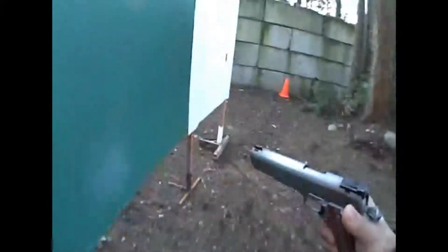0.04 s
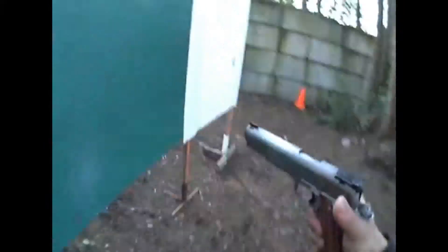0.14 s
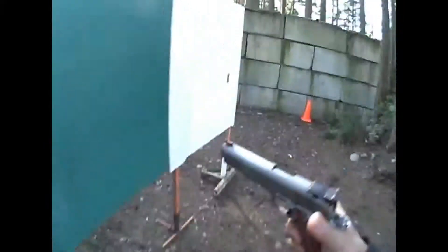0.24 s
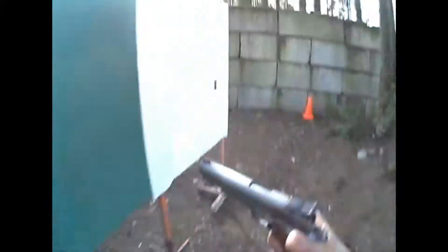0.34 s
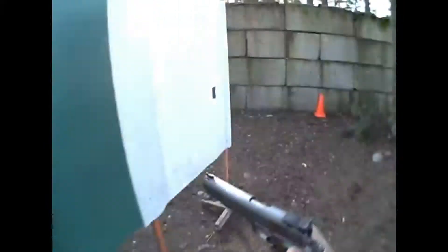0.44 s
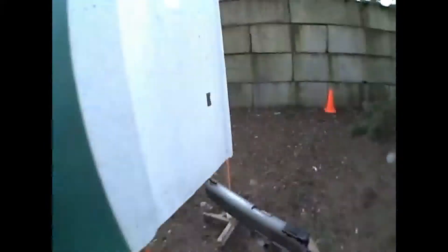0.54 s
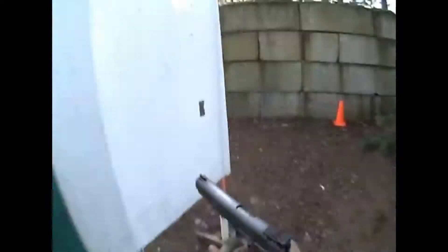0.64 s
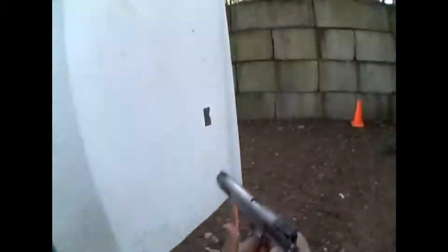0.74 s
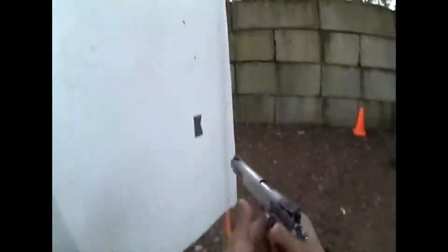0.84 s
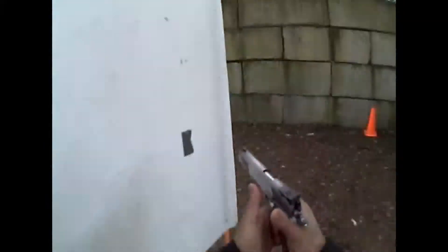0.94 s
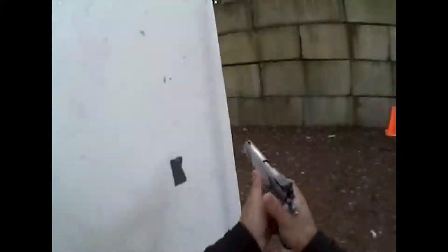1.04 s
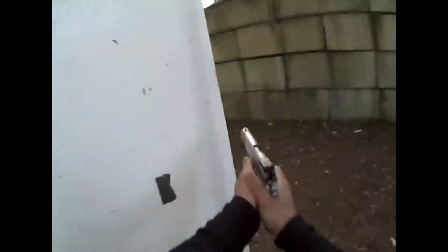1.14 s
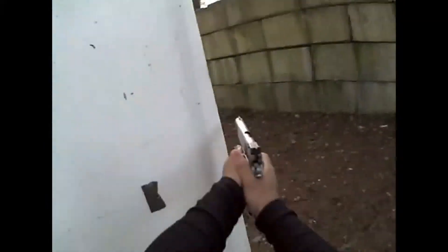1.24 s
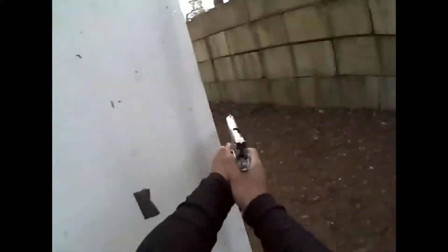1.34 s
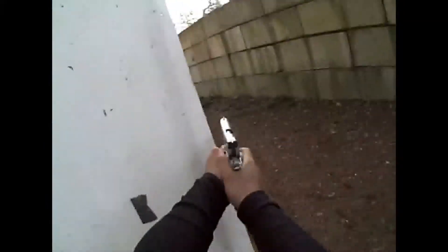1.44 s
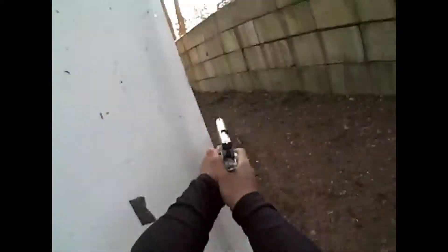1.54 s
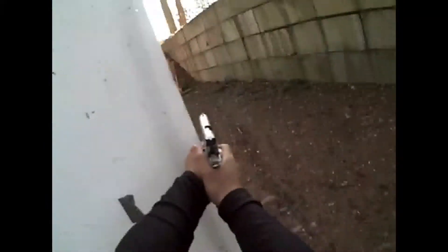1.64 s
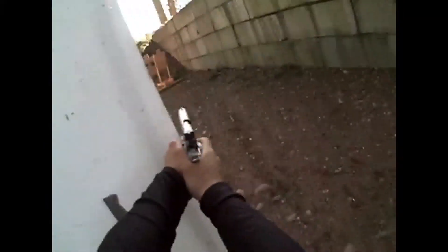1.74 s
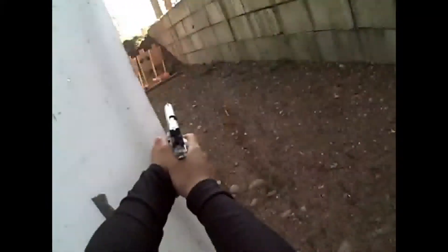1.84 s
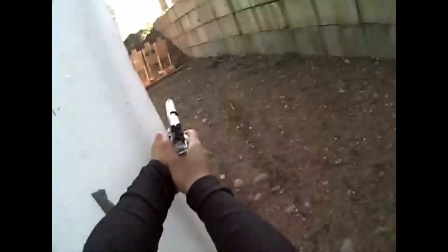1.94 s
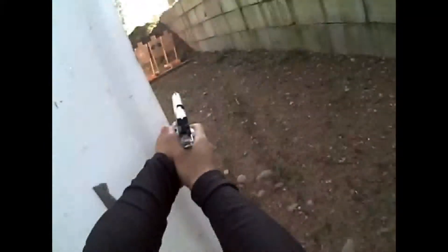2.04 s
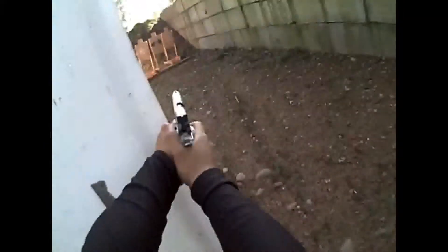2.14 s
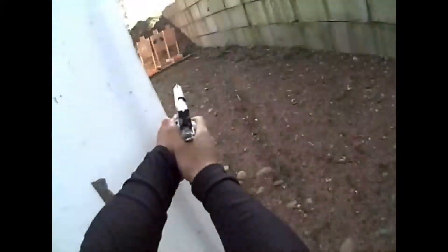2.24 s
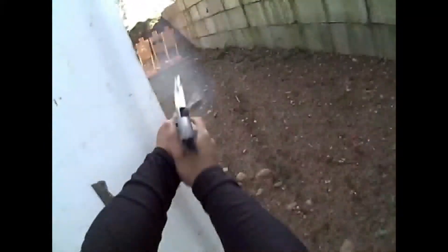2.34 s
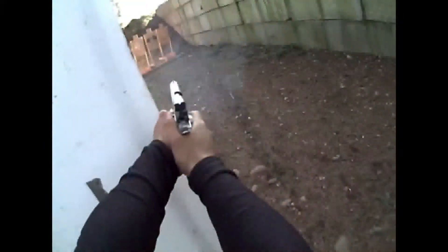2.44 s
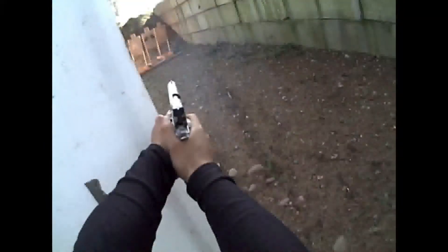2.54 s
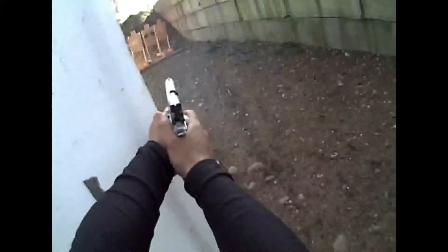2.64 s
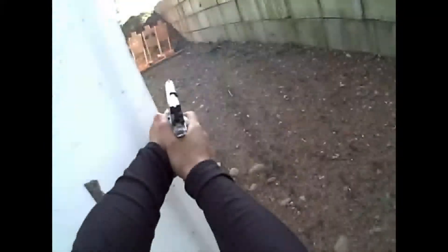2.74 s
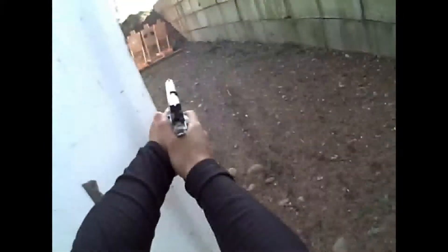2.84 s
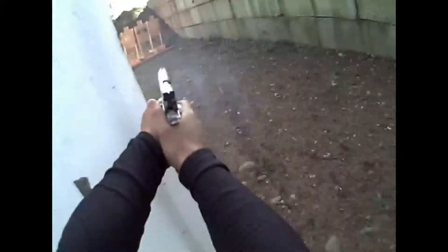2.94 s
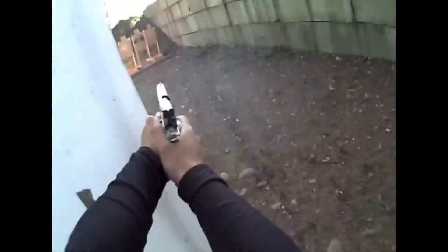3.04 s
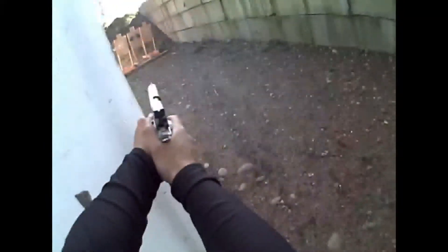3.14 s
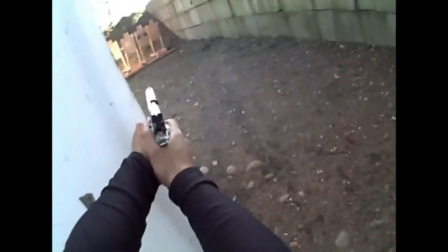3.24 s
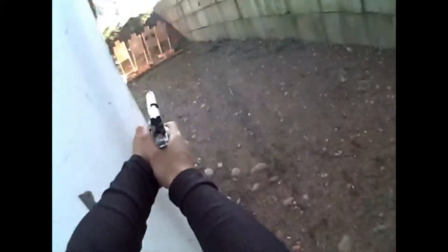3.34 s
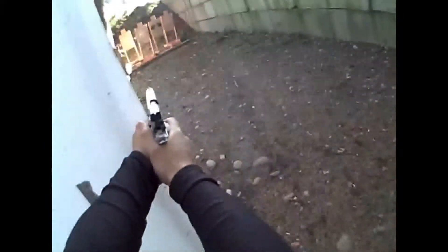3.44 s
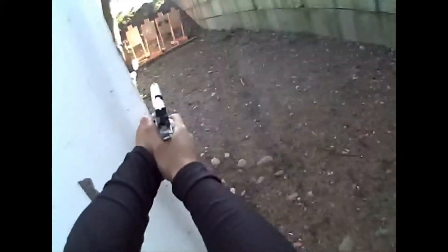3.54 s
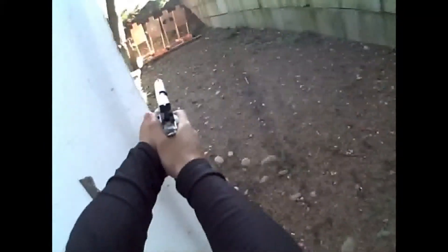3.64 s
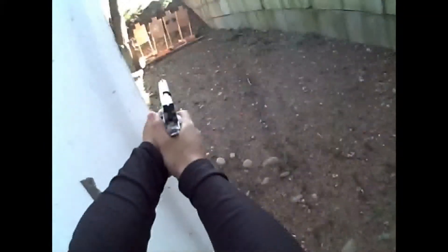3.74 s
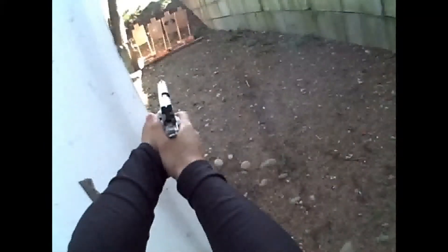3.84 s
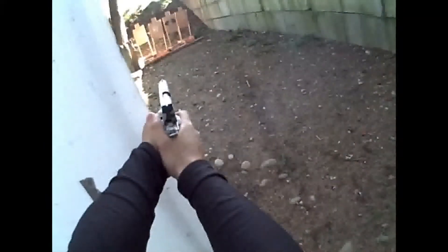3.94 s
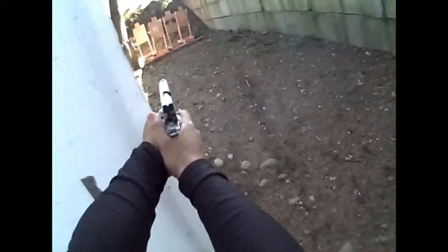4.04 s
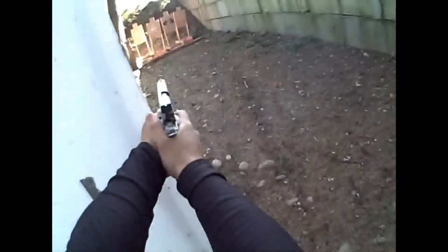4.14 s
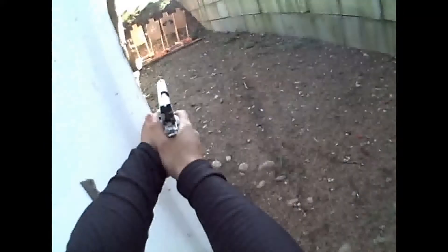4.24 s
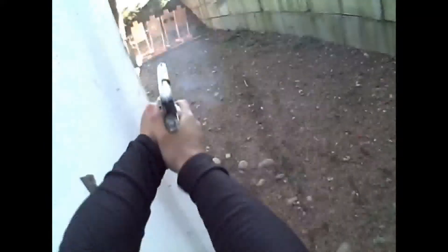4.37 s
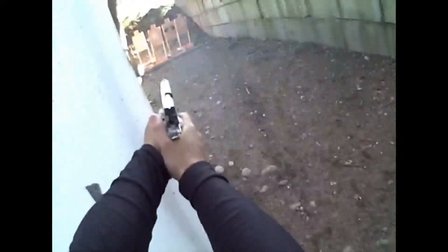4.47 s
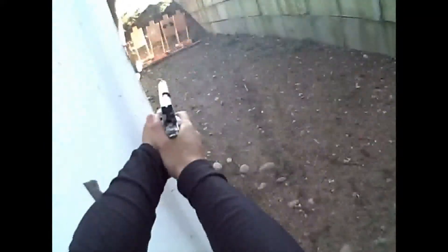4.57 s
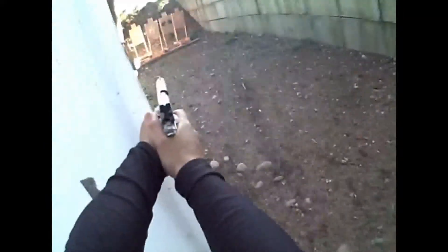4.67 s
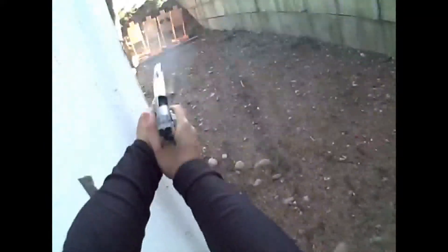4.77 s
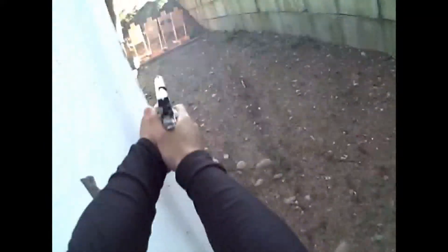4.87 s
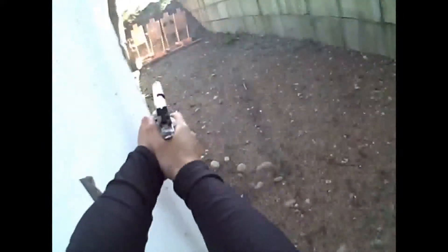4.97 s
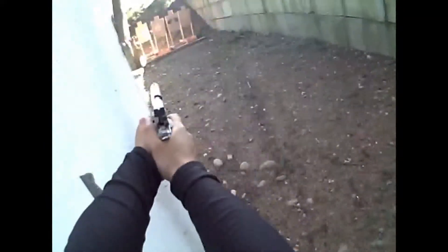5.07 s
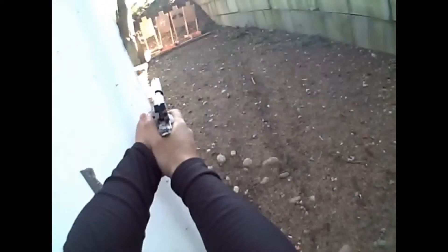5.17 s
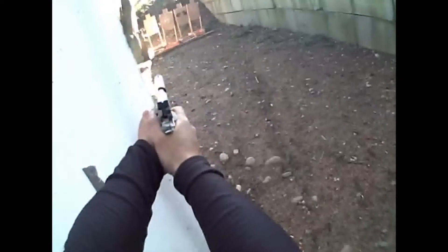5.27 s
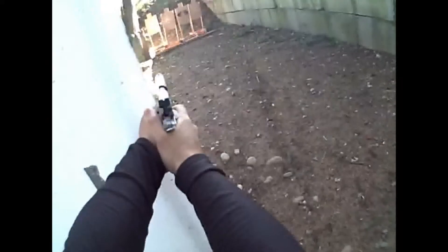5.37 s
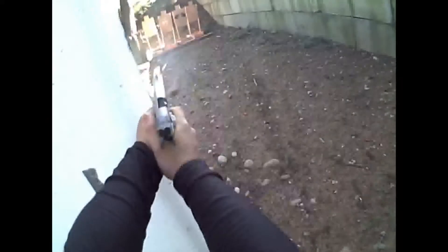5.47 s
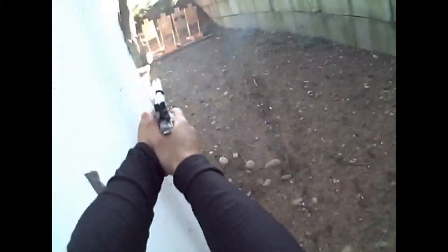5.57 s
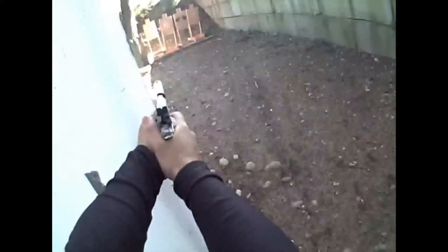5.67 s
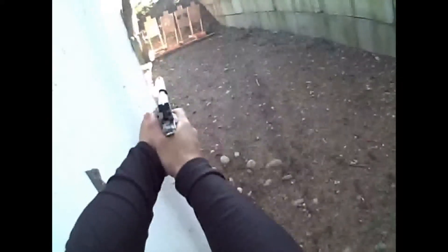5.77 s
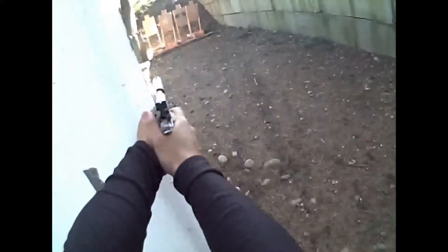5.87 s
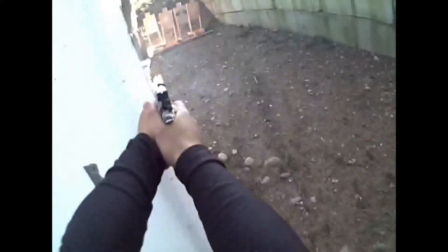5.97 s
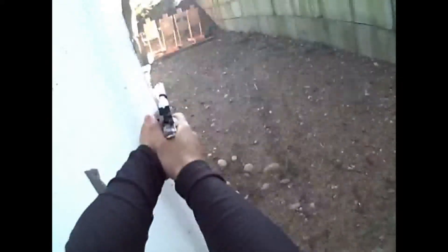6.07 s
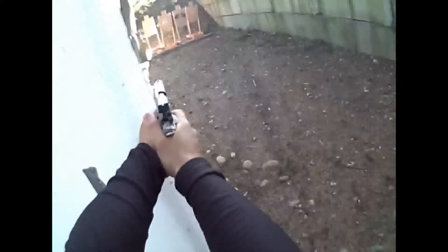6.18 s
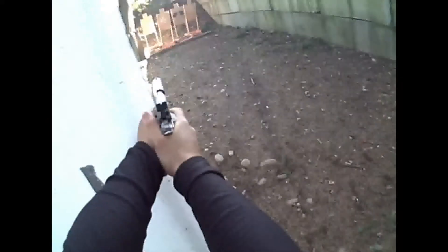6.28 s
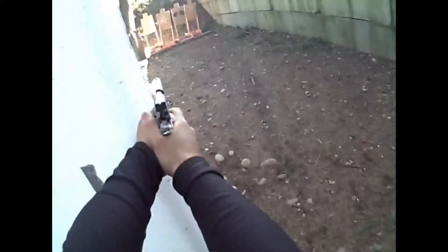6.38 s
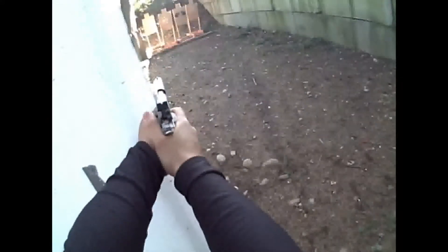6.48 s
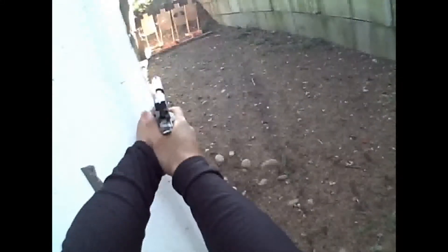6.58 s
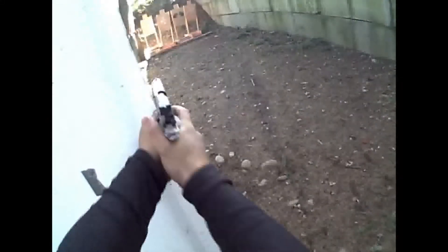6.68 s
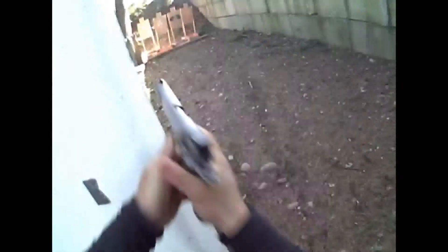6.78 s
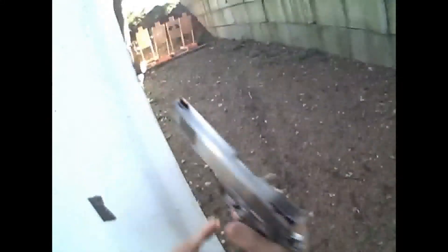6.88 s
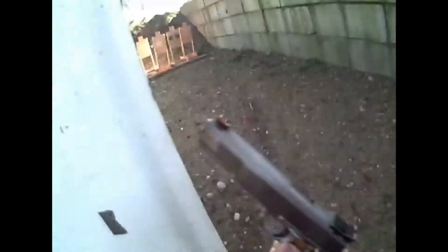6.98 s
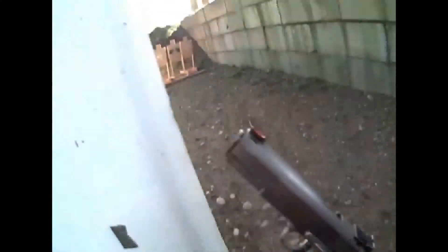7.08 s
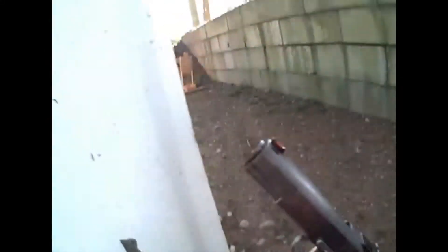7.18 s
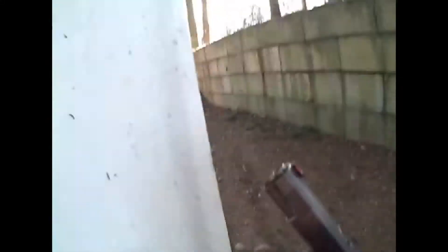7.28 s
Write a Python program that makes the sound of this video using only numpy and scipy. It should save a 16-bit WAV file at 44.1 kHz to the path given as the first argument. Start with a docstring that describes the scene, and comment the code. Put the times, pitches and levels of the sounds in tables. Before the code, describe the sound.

A close pistol fires three pairs of sharp, booming shots, about half a second apart within each pair, distorting a head-worn microphone and echoing briefly off walls and surrounding woods. Before the firing, the shooter steps up with dull thuds, cloth rustle and a few clicks while duller gunshots roll in from other bays. A faint distant roar and low air rumble lie underneath.

```python
"""Six pistol shots in three pairs, close to a head-worn microphone in a walled outdoor range bay.
Each blast overloads the microphone, flutters between the block walls and reverberates in the trees.
Shots from neighbouring bays arrive by diffraction over the wall and by scattering from the trunks.
The shooter steps up, his sleeves and gear stir, and a spent case rings on the stones.
Air buffets the microphone over a faint, distant roar."""
import sys
import numpy as np
from scipy import signal
from scipy.fft import rfft, irfft
from scipy.io import wavfile

SR = 44100
rng = np.random.default_rng(int(sys.argv[2]) if len(sys.argv) > 2 else 0)


def unload_wav(signal):
    """Save mono or channel-first audio to the path in sys.argv[1] as 16-bit WAV at rate SR, clipped to [-1, 1]."""
    wavfile.write(
        sys.argv[1],
        SR,
        np.round(np.clip(np.atleast_2d(signal).T, -1, 1) * 32767).astype(np.int16),
    )


N = 322415
T = np.arange(N) / SR
AGE = T[:3 * SR]  # time since an onset

# Reverberation of the forest. Each row: frequency in Hz, relative level in dB, T60 in seconds.
FOREST_BANDS = [(40, -9.5, 2.8), (170, -11.5, 16), (280, -12, 6.7), (453, -2.5, 2.8), (900, 2.5, 2.1),
                (1660, -3, 1.9), (2880, -3, 1.4), (5500, -6, 1.2), (8500, -12, 0.78)]
# Spectrum of distant sound. Each row: frequency in Hz, relative level in dB.
DISTANT_SPECTRUM = [(40, -9.5), (250, -5.5), (520, 4.5), (1050, -0.5), (1700, -8), (3200, -16), (6000, -23),
                    (8500, -23)]


def amp(db):
    """Amplitude ratio of a level in decibels."""
    return 10 ** (np.asarray(db) / 20)


def read(points, hz, column=1):
    """Interpolation of one table column on a logarithmic frequency axis."""
    table = np.transpose(points)
    return np.interp(np.log(hz + 1), np.log(table[0]), table[column])


def add(mix, start_s, sound):
    """Superposition of a sound on the mix; its onset may precede time zero."""
    at = round(start_s * SR)
    sound = sound[max(-at, 0):]
    part = mix[max(at, 0):][:len(sound)]
    part += sound[:len(part)]


def lowpass(x, hz):
    """Zero-phase low-pass filtering with a windowed sinc."""
    return signal.oaconvolve(x, signal.firwin(301, hz, window=("kaiser", 9), fs=SR), "same")


def noise(spectrum, size, top_hz=8750):
    """Spectral shaping of white noise, band-limited and scaled to unit rms."""
    hz = np.fft.rfftfreq(size, 1 / SR)
    x = irfft(rfft(rng.standard_normal(size)) * amp(read(spectrum, hz)) * (hz < top_hz), size)
    return x / x.std()


def reverberation(bands, rise_s):
    """A diffuse field builds up, then decays exponentially with each band's own T60."""
    hz, t, frames = signal.stft(noise(bands, len(AGE)), SR, nperseg=512)
    t60 = read(bands, hz, column=2)[:, None]
    decaying = signal.istft(frames * np.exp(-np.log(1000) * t / t60), SR, nperseg=512)[1]
    return decaying[:len(AGE)] * (1 - np.exp(-AGE / rise_s))


def burst(spectrum, decay_s):
    """A noise transient with instant onset and exponential decay."""
    t = AGE[:SR // 2]
    return noise(spectrum, len(t)) * np.exp(-t / decay_s)


def movement(rise_s=0.017, fade_s=0.073):
    """Amplitude envelopes of air buffet and sleeve rustle: each move rises, holds and fades."""
    # The shooter steps up, pushes his arms out, settles, shifts his aim twice and lowers the pistol.
    # Each row: start in seconds, end in seconds, buffet in dB, rustle in dB.
    moves = [(-.1, 1.313, -32, -70), (1.37, 1.601, -31, -57.5), (1.77, 2.347, -30, -61),
             (4.035, 4.2, -47.5, -87), (5.231, 5.408, -46.5, -84), (6.846, 7.307, -58, -89.5)]
    buffet, rustle = np.zeros((2, N))
    for start, end, buffet_db, rustle_db in moves:
        shape = np.clip((T - start) / rise_s, 0, 1) * np.exp(-np.maximum(T - end, 0) / fade_s)
        buffet += amp(buffet_db) * shape
        rustle += amp(rustle_db) * shape
    return buffet, rustle


def outdoor_air(buffet, roar_db=-81, still_db=-59):
    """Ambient roar of range and woods, and flow noise that grows as the microphone moves."""
    # Buffeting at the microphone. Each row: frequency in Hz, relative level in dB.
    flow_spectrum = [(3, 18), (12, 9.5), (35, -0.5), (70, -14), (140, -24.5), (300, -42.5), (1000, -70.5)]
    roar = amp(roar_db) * noise(DISTANT_SPECTRUM, N)
    return roar + (amp(still_db) + buffet) * noise(flow_spectrum, N)


def neighbouring_shots(wall_s=0.072, wall_db=-5, trees_s=0.0072, late_peak_s=0.92):
    """Diffraction over the wall dulls each crack; the far wall reflects it and the trees scatter it."""
    # Shots in other bays. Each row: start in seconds; crack, scatter, forest roll and late echo in dB;
    # tilt of scatter and roll about 1 kHz in dB per octave.
    shots = [(-.16, -60, -45, -45, -75, -2), (.8070, -31, -40, -33, -48, 0),
             (1.783, -45, -49.5, -39, -68, -2), (2.1010, -11, -19, -33.5, -57.5, 1),
             (4.263, -85, -58, -66.5, -73, 0), (5.264, -85, -61.5, -62.5, -87, 0),
             (7.241, -62, -74, -74, -85, 0.5)]
    # Scattering from trunks. Each row: frequency in Hz, relative level in dB, T60 in seconds.
    trunk_bands = [(40, 3.5, 0.72), (120, 8, 0.22), (260, -4, 0.6), (450, 0.5, 0.67), (950, 0, 0.71),
                   (1570, -6.5, .7), (2800, -8.5, 0.71), (4000, -10, 0.68), (6360, -8.5, .56),
                   (8700, -19, 0.59)]
    # The diffracted crack. Each row: frequency in Hz, relative level in dB.
    crack_spectrum = [(40, 6), (150, -5.5), (350, 5), (670, -0.5), (1000, -12), (1500, -14), (3000, -22),
                      (8500, -31.5)]
    out, hz = np.zeros(N), np.fft.rfftfreq(len(AGE), 1 / SR)
    octaves = np.log2(np.maximum(hz, 500) / 1000)
    late_swell = (AGE / late_peak_s * np.exp(1 - AGE / late_peak_s)) ** 3.4  # echo from the far woods
    for start, crack_db, scatter_db, roll_db, late_db, tilt_db in shots:
        scatter = reverberation(trunk_bands, rise_s=0.092)
        scatter /= scatter[:SR // 5].std()  # unit rms over its loud part
        echoes = amp(scatter_db) * scatter + amp(roll_db) * reverberation(FOREST_BANDS, rise_s=0.17)
        add(out, start + trees_s, irfft(rfft(echoes) * amp(tilt_db * octaves), len(AGE)))
        add(out, start, amp(late_db) * late_swell * noise(DISTANT_SPECTRUM, len(AGE)))
        crack = amp(crack_db) * burst(crack_spectrum, decay_s=0.015)
        add(out, start, crack)
        add(out, start + wall_s, amp(wall_db) * crack)
    return out


def sleeves(rustle):
    """Friction of sliding cloth makes a hiss that follows the movement."""
    # Cloth friction. Each row: frequency in Hz, relative level in dB.
    cloth_spectrum = [(500, -29), (2500, -5.5), (4500, -6), (6800, -2), (8500, -10.5)]
    return rustle * noise(cloth_spectrum, N)


def clicks(half_width_octaves=0.18):
    """Impacts of gear, grit and the pistol's catch each excite a tick and one damped resonance."""
    # Each row: start in seconds, tick in dB, ring in dB, resonance in Hz, ring decay in seconds.
    impacts = [(.146, -49, -47, 260, .012), (0.396, -46.5, -48, 465, 0.0049), (0.4763, -57, -60, 236, .006),
               (0.6466, -55, -48, 302, .008), (1.7824, -26.5, -37.5, 3450, 0.0053),
               (1.941, -33, -34, 2190, 0.0077), (1.976, -56, -43, 2400, .006),
               (7.078, -72, -70, 6000, .006)]
    # The contact tick. Each row: frequency in Hz, relative level in dB.
    tick_spectrum = [(100, 10.5), (900, 0), (1600, 7.5), (3200, -8), (6500, -11), (8500, -43)]
    out, hz = np.zeros(N), np.geomspace(100, 8500, 100)
    for start, tick_db, ring_db, ring_hz, ring_s in impacts:
        resonance_db = -20 * np.log10(1 + (np.log2(hz / ring_hz) / half_width_octaves) ** 2)
        add(out, start, amp(tick_db) * burst(tick_spectrum, decay_s=0.0036))
        add(out, start, amp(ring_db) * burst(np.c_[hz, resonance_db], decay_s=ring_s))
    return out


def thud(rise_s=0.00097):
    """Conduction through the body leaves mainly the low frequencies of an impact."""
    # The conducted impact. Each row: frequency in Hz, relative level in dB.
    thud_spectrum = [(20, 3), (60, -2.5), (140, -11), (300, -25), (800, -62.5), (3000, -73)]
    puff = burst(thud_spectrum, decay_s=0.023)
    return puff * (1 - np.exp(-AGE[:len(puff)] / rise_s))


def steps_and_jostles(buffet, jostles_per_s=6.5, jostle_db=-11):
    """Structure-borne sound: steps thud, and gear jostles at random, scaled by the buffet of a move."""
    # Steps and bumps. Each row: start in seconds, level in dB.
    bumps = [(.148, -26.5), (.19, -25), (.475, -37.5), (0.644, -36.5), (0.861, -25.5), (1.397, -32.5),
             (1.793, -21.5), (1.947, -18), (7.237, -54)]
    out = np.zeros(N)
    for start, db in bumps:
        add(out, start, amp(db) * thud())
    jostles = amp(jostle_db) * buffet * (rng.random(N) < jostles_per_s / SR)
    return out + signal.oaconvolve(jostles, thud())[:N]


def flutter_echo(column, first_db, loss_db, first_s=0.0368, trip_s=0.0208, smear_s=0.0038):
    """Envelope of a blast and its reflections, summed in energy; each trip between walls loses level."""
    # Direct sound and first reflections from ground and screen.
    # Each row: delay in seconds, boom in dB, crack in dB, smear in seconds.
    paths = [(0, -3.5, -3.5, 0.0015), (.0042, -2, -2.5, .0038), (0.0194, -8, -7.5, .0036)]
    arrivals = [(path[0], path[column], path[3]) for path in paths]
    for trip in range(8):
        slap_db = first_db - trip * loss_db - 3 * (trip % 2)  # every other slap is weaker still
        arrivals.append((first_s + trip * trip_s, slap_db, smear_s))
    energy = np.zeros(len(AGE))
    for delay, db, smear in arrivals:
        energy += (AGE >= delay) * amp(db) ** 2 * np.exp(-2 * abs(AGE - delay) / smear)
    return np.sqrt(energy)


def muzzle_blast(bay_db=-19):
    """A low boom and a sharp crack with their reflections; the crack carries the bay's reverberation."""
    # Spectra of the blast. Each row: frequency in Hz, relative level in dB.
    boom_spectrum = [(40, -11.5), (95, 2), (140, -6.5), (230, 1), (330, 4), (480, -6), (700, 4.5),
                     (1000, -6.5), (1600, -10), (3500, -30)]
    crack_spectrum = [(300, -25.5), (1000, -12.5), (1700, -2), (2600, 3), (3800, -3), (5400, 1),
                      (7000, -1.5), (8500, -6)]
    # Reverberation of the bay. Each row: frequency in Hz, relative level in dB, T60 in seconds.
    bay_bands = [(60, -12, 0.85), (232, -9.5, 0.6), (355, 7.5, 0.33), (460, -1.5, .48), (640, 3, 0.42),
                 (760, -1, 0.56), (895, 3.5, 0.4), (1120, 0, 0.47), (1670, -6, 0.47), (2720, -5, 0.5),
                 (3800, -9, 0.45), (5530, -5, 0.42), (7200, -12, .42), (8650, -13.5, 0.35)]
    boom = flutter_echo(column=1, first_db=-7, loss_db=4) * noise(boom_spectrum, len(AGE))
    crack = flutter_echo(column=2, first_db=-15, loss_db=4.5) * noise(crack_spectrum, len(AGE))
    return np.array([boom, crack + amp(bay_db) * reverberation(bay_bands, rise_s=0.0071)])


def microphone_overload(push, hold_s=0.0378):
    """Overload pins the microphone; a harder push lets go faster, rebounds further, recovers sooner."""
    released = (1 + np.tanh((AGE - hold_s) * push ** 1.7 / 0.0026)) / 2
    kick = 0.55 * np.exp(-((AGE - 0.0195) / 0.0031) ** 2)  # a brief swing back towards rest
    pinned = push * (np.exp(-AGE / 0.0011) - 1 + kick)
    recovery = np.maximum(AGE - hold_s, 0) * push ** 0.99 / 0.07
    overshoot = np.exp(-recovery ** 2) - 0.068 * recovery ** 2 * np.exp(-recovery)
    return pinned * (1 - released) + 0.67 * push ** 1.64 * overshoot * released


def pistol(correlation=0.7, boom_db=-3, forest_db=-50, boom_growth=0.083, roll_cutoff_hz=380):
    """Fixed paths give correlated near echoes, as the shooter stands still; the forest roll is diffuse."""
    # Each row: start in seconds, level in dB, push of the pressure wave on the microphone as a gain.
    shots = [(2.411, 13.5, 1.01), (2.951, 7.5, 0.58), (4.3720, 4, 0.51), (4.8118, 0.5, 0.47),
             (5.513, 0, 0.34), (5.9440, -1.5, .28)]
    out, common = np.zeros(N), muzzle_blast()
    # A pistol sends little bass into the trees.
    bass_cut = signal.butter(2, roll_cutoff_hz, "highpass", fs=SR, output="sos")
    for start, db, push in shots:
        boom, crack = np.sqrt(correlation) * common + np.sqrt(1 - correlation) * muzzle_blast()
        roll = signal.sosfilt(bass_cut, reverberation(FOREST_BANDS, rise_s=0.099))
        depth = amp(boom_db) * boom + amp(forest_db) * roll
        report = crack + amp(boom_growth * db) * depth  # louder shots boom and roll more
        add(out, start, amp(db) * report + microphone_overload(push))
    return out


def spent_case(mode_hz=7660, decay_s=0.021):
    """Free vibration of one damped mode of a brass case, excited by each bounce on the stones."""
    # Each row: time of the bounce in seconds, level in dB.
    bounces = [(4.125, -73), (4.148, -71), (4.185, -86.5)]
    out = np.zeros(N)
    for start, db in bounces:
        add(out, start, amp(db) * np.sin(2 * np.pi * mode_hz * AGE) * np.exp(-AGE / decay_s))
    return out


def scene():
    """Superposition of all sources at one microphone."""
    buffet, rustle = movement()
    gunfire = pistol() + neighbouring_shots()
    shooter = sleeves(rustle) + steps_and_jostles(buffet) + clicks()
    return (gunfire + shooter + spent_case() + outdoor_air(buffet))[None]


def saturate(x, ceiling):
    """Soft saturation: linear for small signals, rounding off towards the ceiling."""
    return x / (1 + (x / ceiling) ** 6) ** (1 / 6)


def record(dry, whine_hz=8000, whine_db=-95, hiss_db=-88, rail=0.7, band_hz=8550, edge_hz=16000):
    """Self-noise and nonlinear distortion: the input saturates, and filter overshoot is clipped hard."""
    electronics = amp(whine_db) * np.sin(2 * np.pi * whine_hz * T) + amp(hiss_db) * rng.standard_normal(N)
    narrow = lowpass(saturate(dry[0] + electronics, ceiling=0.7), band_hz)
    return lowpass(np.clip(narrow, -rail, rail), edge_hz)[None]


dry = scene()
out = record(dry)
unload_wav(out)
```